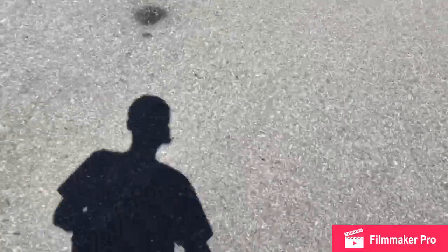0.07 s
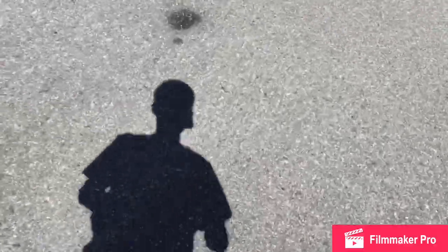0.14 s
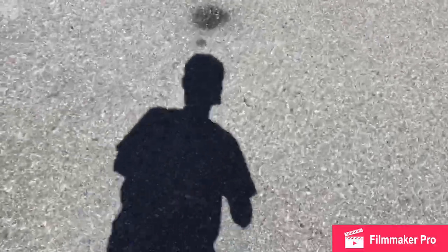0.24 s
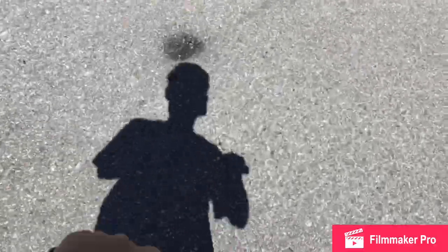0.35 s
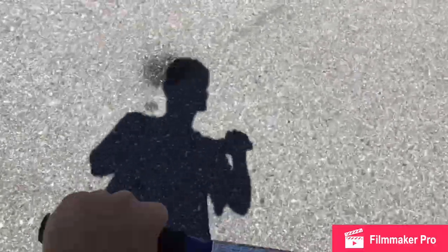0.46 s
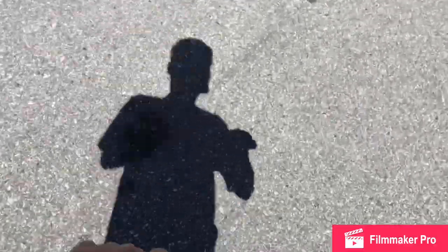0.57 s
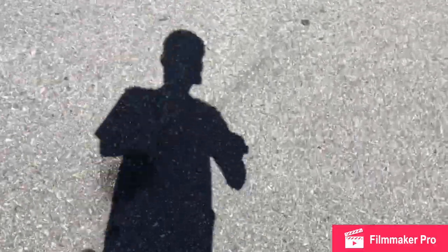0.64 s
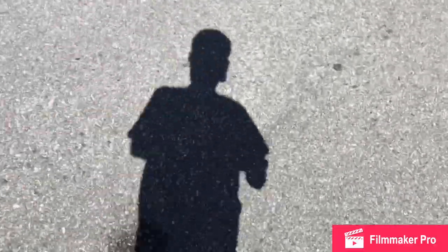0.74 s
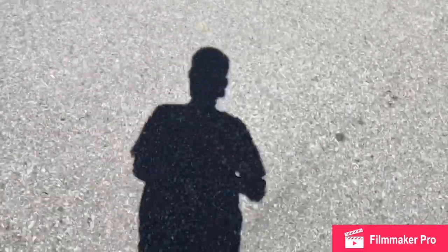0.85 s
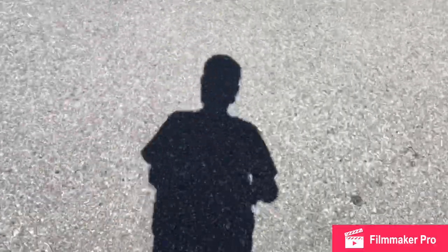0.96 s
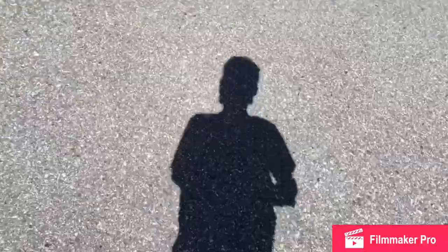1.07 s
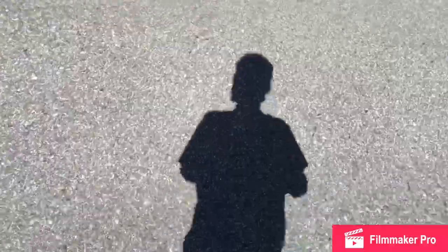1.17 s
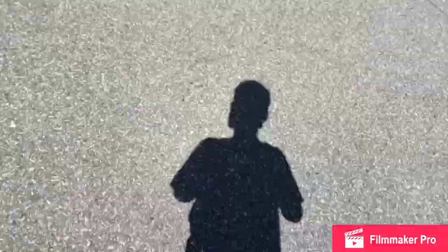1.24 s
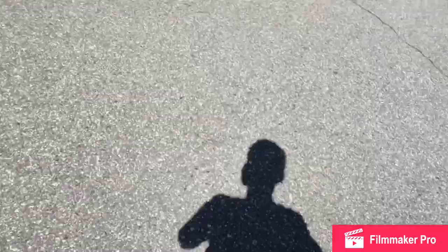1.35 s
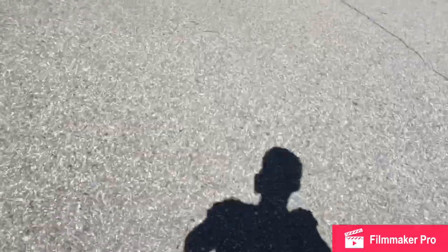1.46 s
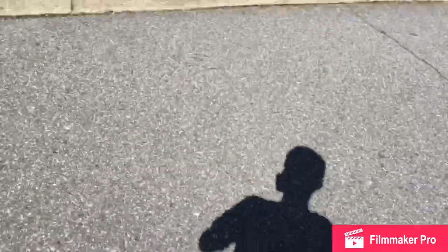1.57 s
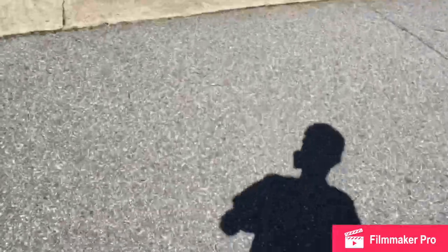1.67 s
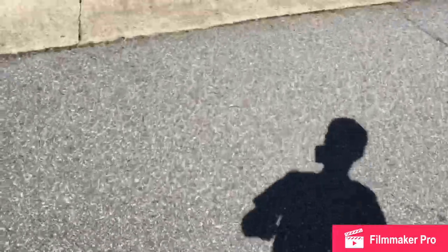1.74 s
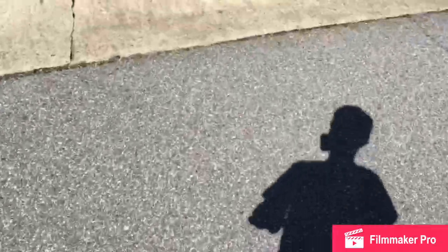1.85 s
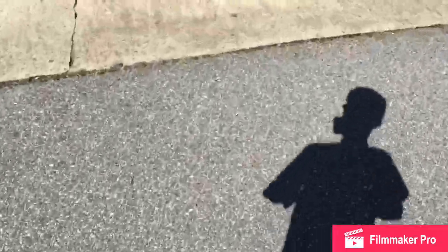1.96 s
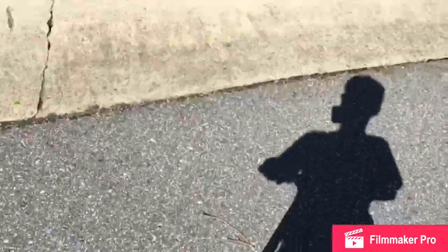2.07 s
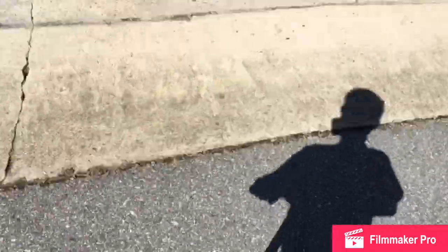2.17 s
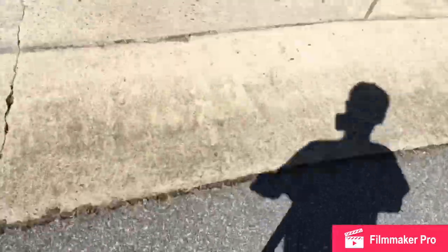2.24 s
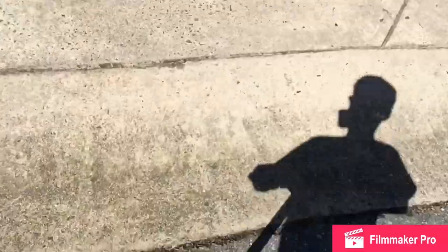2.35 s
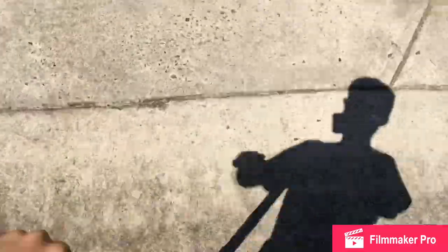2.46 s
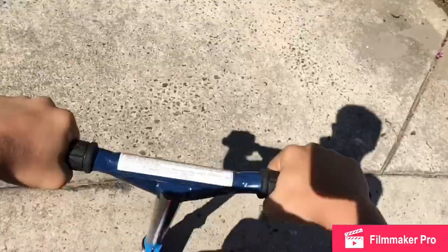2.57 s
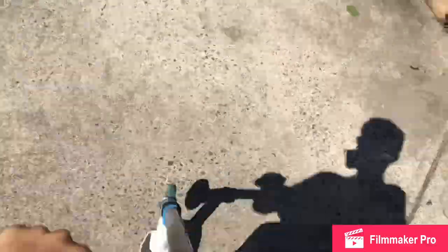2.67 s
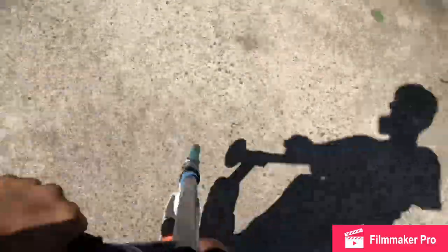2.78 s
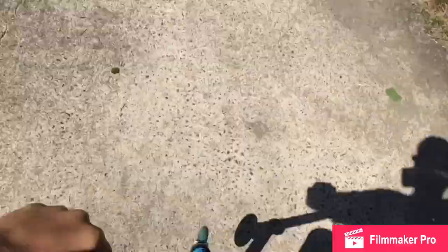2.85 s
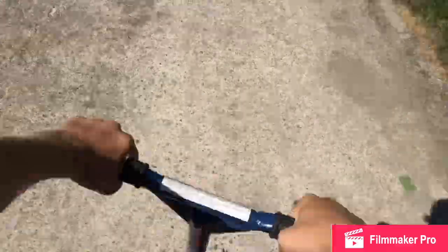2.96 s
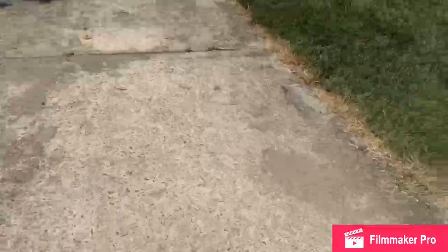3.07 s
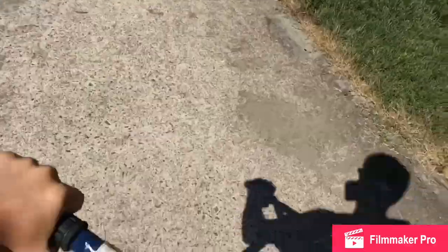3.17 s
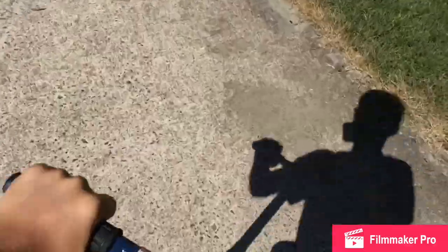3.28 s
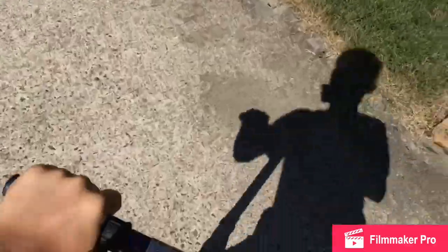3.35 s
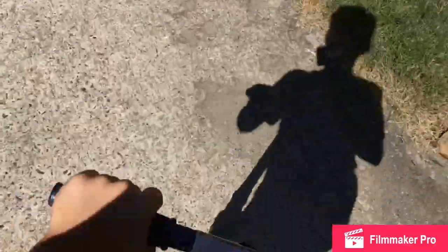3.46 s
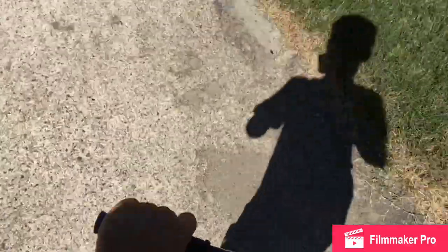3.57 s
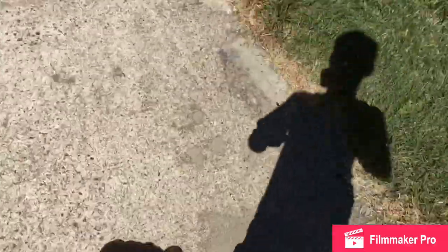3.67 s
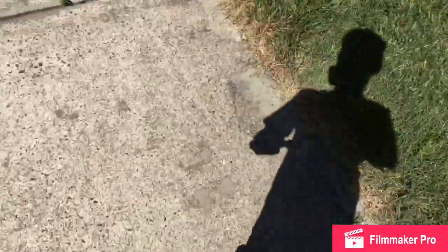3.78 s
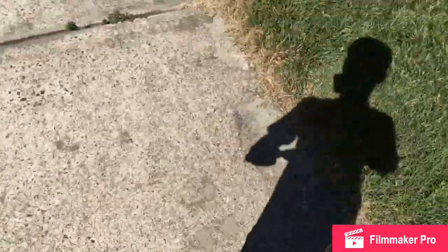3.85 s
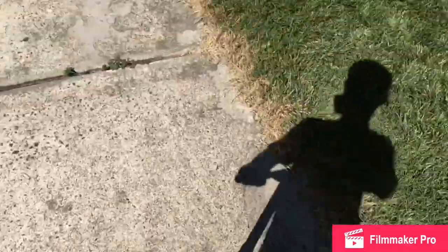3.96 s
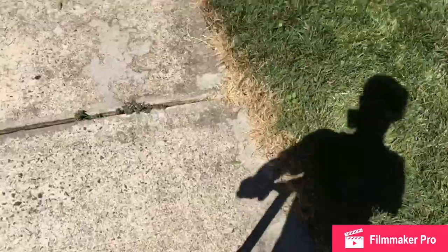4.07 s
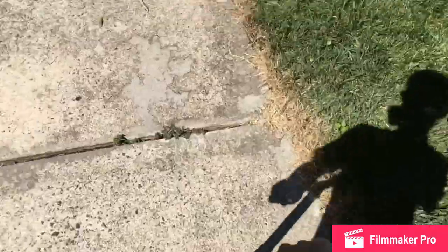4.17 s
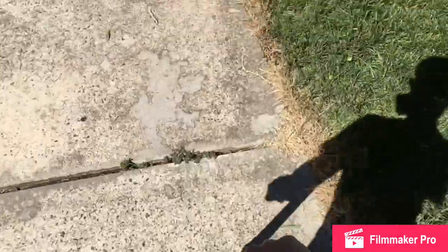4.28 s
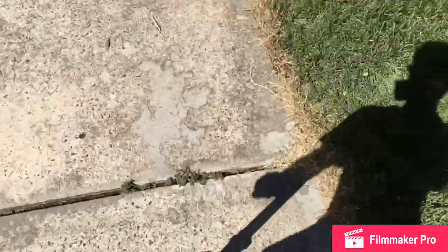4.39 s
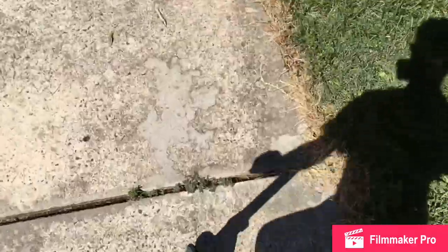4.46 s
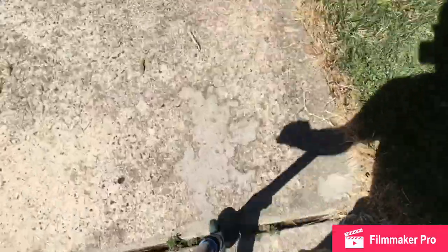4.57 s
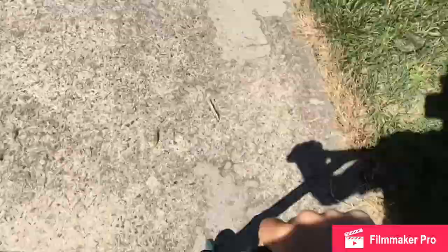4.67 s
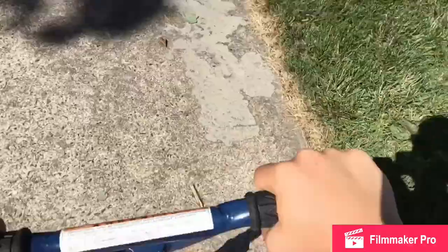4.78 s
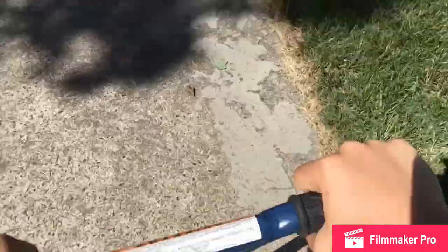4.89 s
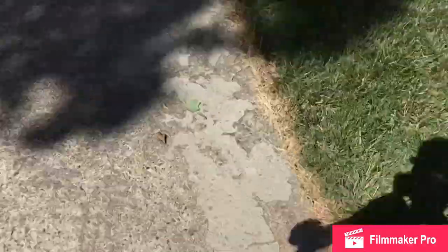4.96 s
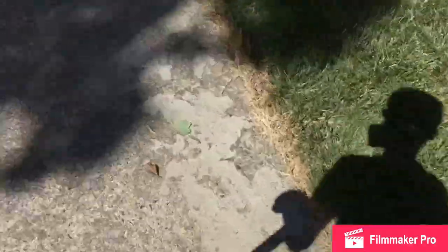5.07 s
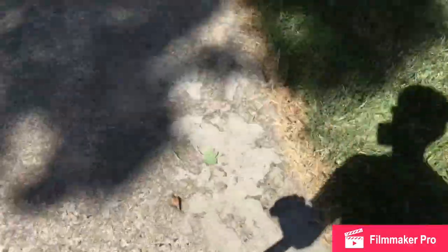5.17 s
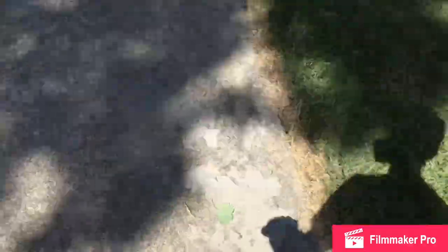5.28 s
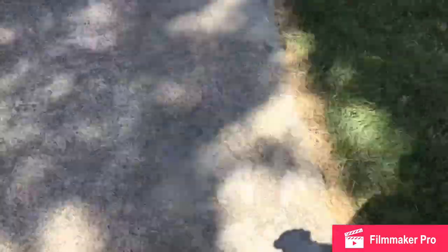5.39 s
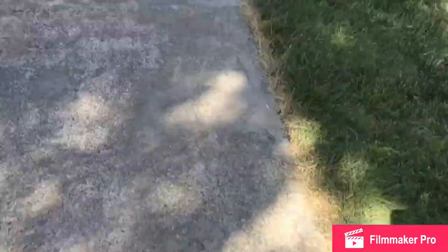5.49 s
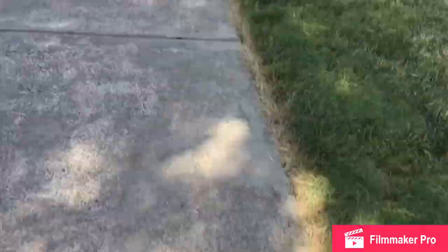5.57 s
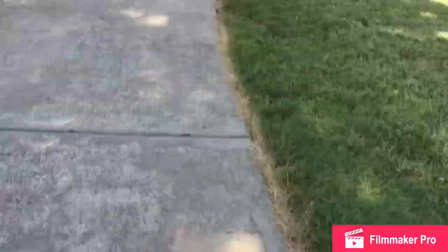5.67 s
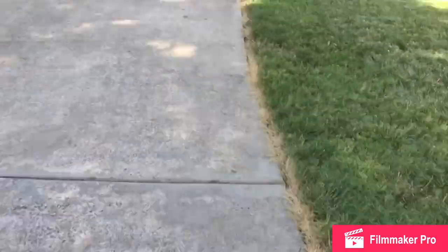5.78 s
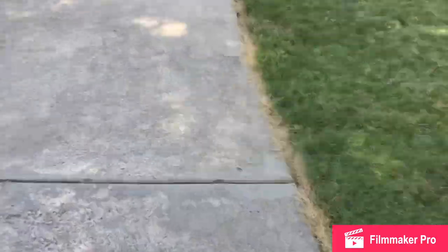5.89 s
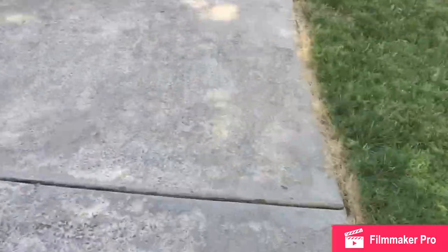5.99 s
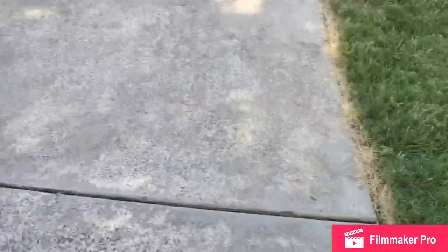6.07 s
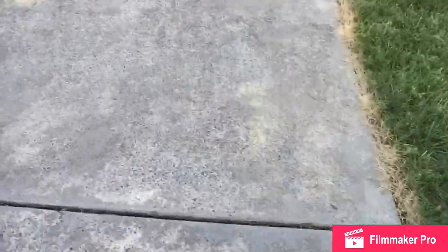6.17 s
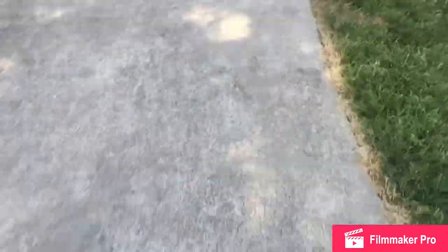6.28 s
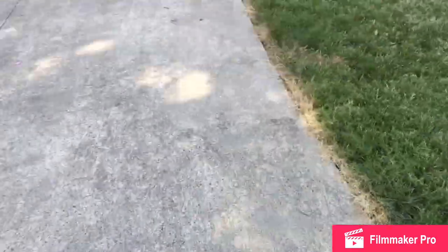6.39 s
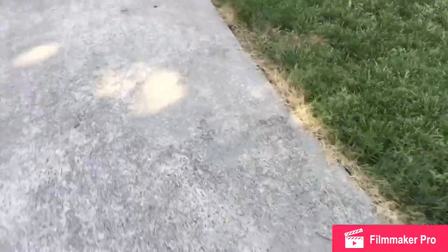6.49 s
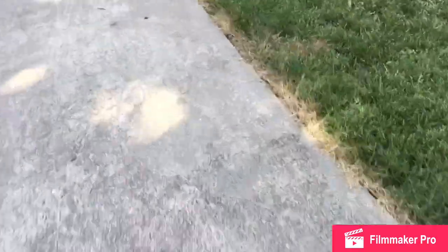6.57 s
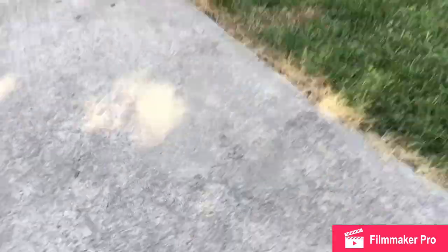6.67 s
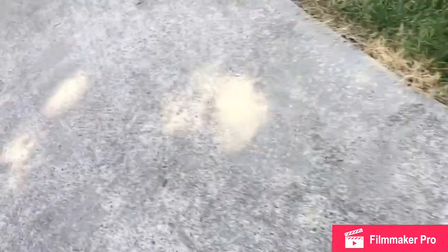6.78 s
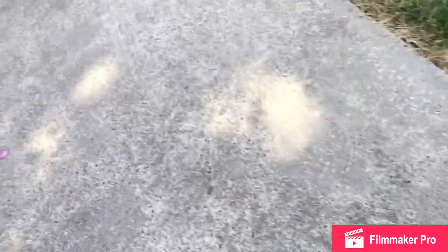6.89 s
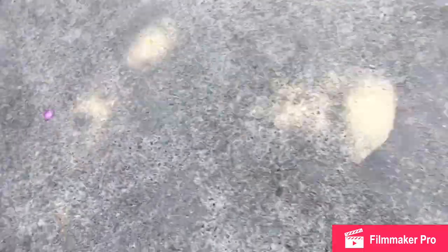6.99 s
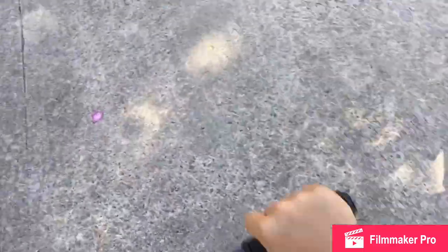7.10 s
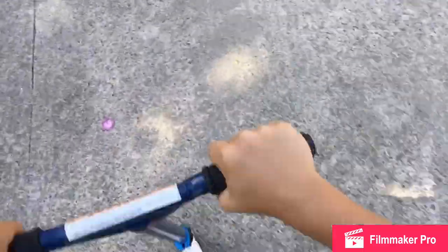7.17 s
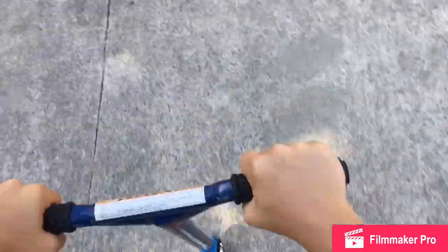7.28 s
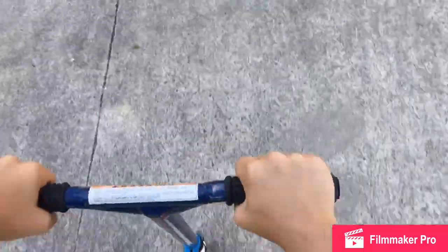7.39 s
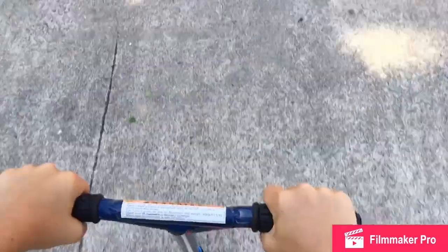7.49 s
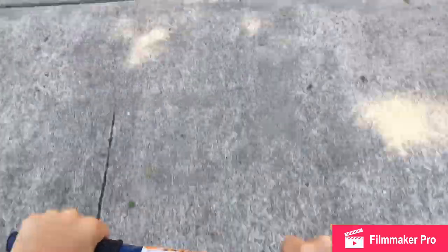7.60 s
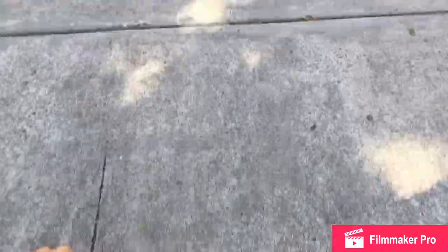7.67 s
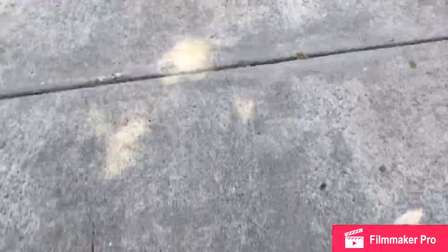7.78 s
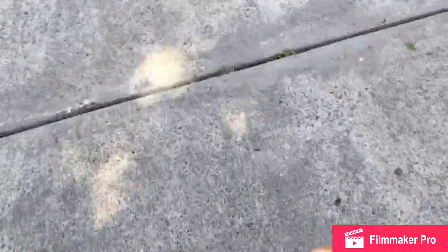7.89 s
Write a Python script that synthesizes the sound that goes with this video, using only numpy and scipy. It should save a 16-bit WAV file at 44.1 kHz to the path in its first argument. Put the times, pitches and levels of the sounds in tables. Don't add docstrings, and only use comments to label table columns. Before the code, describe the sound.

A low grainy rolling sound with faint gritty hiss and thin wheel whirr, wind buffeting the microphone. Ticking thickens before a burst of kerb knocks and scrapes, followed by one sharp ringing landing clack, the loudest event. Afterwards it is calmer: shoe scuffs, sandy crunch, and isolated then clustered hollow knocks on concrete. Open dry street, heard close from the handlebar.

```python
import sys
import numpy as np
from scipy import signal
from scipy.io import wavfile

SR = 44100
rng = np.random.default_rng(int(sys.argv[2]) if len(sys.argv) > 2 else 0)


def makeup_ratio(level_db):
    decades = np.asarray(level_db, float) / 20
    return 10 ** decades


def materialize(psi):
    bounded = np.clip(np.atleast_2d(psi).T, -1, 1)
    quanta = np.round(bounded * 32767).astype(np.int16)
    wavfile.write(sys.argv[1], SR, quanta)


N = 350154

# time in seconds, level in dB.
BREEZE = [(0, -73), (0.5, -41), (1.2, -49.5), (2.5, -46), (3.2, -49), (4.8, -47.5), (5.9, -46.5),
          (6.8, -42.5), (7.4, -64), (7.94, -46)]
# peak time in seconds, peak in dB,
# rise and fall in seconds per 10 dB.
GUSTS = [(0.0, -32.5, .02, 0.0098), (0.16, -55, 0.027, 0.39), (0.43, -38, 0.88, 0.016),
         (1.3, -45, 0.16, 0.09), (1.64, -28.5, 0.022, 0.033), (2.1, -43, 0.32, 0.39),
         (2.56, -39, 0.05, 0.27), (2.735, -23.5, 0.0085, 0.04), (2.99, -40, 0.073, 0.015),
         (3.075, -30, 0.0086, 0.025), (3.29, -49.5, 0.06, 0.29), (3.91, -50, 0.083, 0.17),
         (4.69, -37.5, 0.028, 0.028), (5.08, -42.5, 0.13, 0.069), (6.1, -48, 0.04, 0.048),
         (6.9, -27.5, 0.087, 0.021), (6.98, -44, 0.027, 0.93), (7.54, -51, 0.053, 0.2)]
# frequency in Hz, density in dB per Hz.
WIND_COLOUR = [(18, -40.5), (30, -4), (47, 0), (65, -1), (97, -5.5), (172, -9.5), (204, -16.5), (248, -14),
               (302, -24), (400, -23), (520, -48), (880, -120)]
# start in seconds, peak in dB, pitch in Hz,
# time to fall 60 dB in seconds.
THUMPS = [(2.529, -30, 80, 0.17), (2.7185, -11, 33, 0.11), (2.7485, -23, 79, 0.28), (1, -29, 52, 0.56),
          (1.1, -29, 61, 0.23), (0.36, -28.5, 62, 0.28), (2.783, -16.5, 59, 0.086), (6.842, -26, 180, .05),
          (6.869, -42, 140, 0.056), (6.891, -26, 120, 0.055), (6.913, -19, 72, .1), (6.96, -37, 83, 0.54),
          (2.031, -32.5, 66, 0.49), (0.25, -26.5, 62, 0.16)]
# peak time in seconds, peak in dB, rise and fall in seconds per 10 dB.
DUST = [(.2, -75.5, 0.15, 0.14), (.7, -72.5, 0.16, 0.067), (1.1, -75.5, 0.12, 0.14),
        (1.45, -71, 0.15, 0.12), (2.1, -74, 0.1, 0.21), (3.7, -83, 0.13, 0.031), (4.1, -70.5, 0.11, 0.1),
        (4.25, -74.5, 0.081, 0.083), (5.83, -67, .08, .08), (7.1, -81.5, 0.076, 0.22),
        (7.6, -78.5, 0.11, 0.091), (7.85, -75, 0.13, 0.2)]
# start in seconds, length in seconds, level in dB, fading in dB.
DRAGS = [
    (2.554, 0.02, -57, 17),
    (2.71, 0.046, -37.5, 21),
    (3.08, 0.14, -48.5, 5),
    (3.296, 0.23, -51.5, 5),
    (5.036, 0.042, -40.5, 5.5),
    (5.127, 0.13, -46, 12),
]
# frequency in Hz, density in dB per Hz.
SOLE_COLOUR = [(590, -29.5), (1000, 3.5), (1220, -4), (1630, -1), (2150, -2), (3500, -5), (5070, -15),
               (9380, -26), (16000, -30)]
# peak time in seconds, peak in dB, rise and fall in seconds per 10 dB.
SKIDS = [(.47, -49, .008, 0.0083), (1.46, -53, 0.012, 0.014), (2.54, -38, 0.01, 0.0066),
         (2.585, -43, 0.007, 0.0091), (2.676, -42.5, 0.0044, 0.02), (2.71, -37.5, 0.0055, 0.012),
         (2.755, -41.5, 0.026, 0.015), (2.796, -39.5, 0.004, 0.0053), (2.836, -34, .005, 0.0073),
         (2.85, -46, 0.0058, 0.023), (3.08, -24, 0.0048, 0.0084), (4.68, -47, .005, 0.024),
         (4.98, -47, 0.0035, 0.012), (6.38, -52.5, .005, 0.0063), (6.49, -46.5, .005, 0.034),
         (6.535, -51, .01, 0.053), (6.74, -41, .005, 0.017), (7.22, -47, 0.0071, 0.009)]
# peak time in seconds, peak in dB, rise and fall in seconds per 10 dB.
RASPS = [
    (3.1, -42, 0.014, 0.025),
    (3.16, -53, .03, 0.022),
    (3.205, -54, 0.018, 0.018),
    (3.33, -62, 0.089, 0.031),
    (3.46, -66, 0.072, .03),
    (5.04, -56, 0.021, 0.013),
    (5.15, -63, 0.025, 0.028),
    (2.705, -39, .004, 0.02),
]
# time in seconds, level in dB.
TWANGS = [
    (2.534, -46),
    (2.585, -53),
    (2.701, -43),
    (2.844, -56),
    (3.071, -42),
    (4.972, -54),
]
# pitch in Hz, level in dB, time to fall 60 dB in seconds.
SPRING_MODES = [(4200, -9, .4), (4235, -12, .3), (4520, -3, .15), (3930, -5, .15)]
# time in seconds, pitch in Hz.
HUB_PITCH = [(0.0, 3324), (0.17, 3634), (0.31, 3245), (2.34, 3633), (2.59, 3128), (2.67, 3470),
             (4.38, 3367), (4.42, 3030), (4.71, 3590), (4.78, 3198), (5.48, 3393), (5.7, 3048),
             (5.97, 3434), (7.94, 3133)]
# share of the hub pitch, level in dB, time to fall 60 dB in seconds.
HUB_MODES = [(.76, -8.5, .02), (.96, -0.5, .015), (1.01, 0.5, 0.02), (1.071, -4, 0.02)]
# peak time in seconds, gain in dB, rise and fall in seconds per 10 dB.
COASTING = [(4.1, 5, 0.22, 0.42), (4.58, 6.2, 0.068, 0.041), (5.36, 12, 0.089, 0.032),
            (6.05, 9, 0.07, 0.068), (6.22, 10, 0.067, 0.043), (2.1, 5, 0.17, 0.42)]
# time in seconds, peak in dB.
ASPHALT_TICKS = [(0.1102, -78), (0.1262, -56.5), (0.177, -68), (0.191, -50.5), (0.2334, -55), (0.4175, -59),
                 (.485, -67), (0.5108, -47.5), (0.5846, -60), (.62, -60), (.715, -65), (.845, -62),
                 (0.871, -54), (0.8999, -48), (0.9852, -62), (1.004, -53), (1.018, -51.5), (1.057, -51),
                 (1.2032, -64), (1.222, -51), (1.2785, -60), (1.2896, -49.5), (1.3194, -58), (1.3504, -55),
                 (1.4306, -43), (1.451, -63), (1.4761, -59), (1.507, -46), (1.568, -42), (1.574, -38.5),
                 (1.586, -50), (1.624, -50), (1.653, -52), (1.726, -49.5), (1.7535, -65), (1.786, -49),
                 (1.8317, -47.5), (1.8685, -56), (1.9168, -48), (1.94, -48), (1.96, -39.5), (1.977, -40),
                 (1.9956, -38), (2.019, -49), (2.073, -45.5), (2.1096, -43), (2.1346, -49.5), (2.162, -55),
                 (2.2239, -53), (2.2437, -46), (2.2664, -52), (2.2823, -45), (2.304, -41), (2.32, -50),
                 (2.3413, -49), (2.397, -62), (2.413, -44.5), (2.441, -51)]
# time in seconds, peak in dB.
LATER_TICKS = [(2.516, -54), (2.5264, -42), (2.5326, -28.5), (2.5576, -46), (2.5801, -46), (2.6717, -31),
               (2.695, -26), (2.701, -21), (2.708, -35), (2.7914, -54), (2.8347, -48), (2.865, -50),
               (2.881, -57), (3.051, -51), (3.062, -48), (3.068, -20.5), (3.073, -15), (4.6749, -33),
               (4.701, -39.5), (4.9738, -38.5), (5.385, -56.5), (5.4117, -69), (5.5, -42.5), (5.5414, -63),
               (5.9235, -59), (5.951, -50.5), (6.339, -53), (6.3594, -43), (6.3905, -57), (6.4275, -58),
               (6.486, -37.5), (6.53, -45), (6.616, -47.5), (6.676, -55), (6.694, -46), (6.7334, -36),
               (6.823, -59), (6.913, -51.5), (7.0485, -67), (7.1974, -56), (7.229, -46.5), (7.26, -62),
               (7.3363, -64)]
# start and end in seconds, ticks a second, level in dB.
CHATTER = [(0.088, 0.702, 12, -77), (0.801, 1.5, 18, -70), (1.497, 2.5, 15, -68),
           (3.602, 4.395, 12.8, -71.5), (5.344, 5.566, 14, -72), (6.201, 6.902, 17, -67),
           (7.107, 7.397, 15.1, -72)]
# pitch in Hz, level in dB, time to fall 60 dB in seconds.
CLAMP_MODES = [(3680, -14.5, 0.016), (3960, -4, 0.015), (8510, -2, 0.033), (8740, -16, 0.0067),
               (8550, -17.5, 0.013), (11260, -16.5, 0.02), (12600, -23.5, 0.0086)]
# time in seconds, deck in dB, stem in dB.
BLOWS = [(0.513, -55, -64), (2.533, -41, -30.5), (2.587, -44.5, -50), (2.702, -30, -25.5),
         (2.79, -45.5, -39.5), (2.844, -44.5, -35.5), (3.071, -21, -20), (4.678, -50, -47),
         (4.971, -36.5, -31), (6.53, -46, -35), (6.733, -49, -28), (6.745, -65, -29.5)]
# pitch in Hz, level in dB, time to fall 60 dB in seconds.
DECK_MODES = [(495, 6, 0.15), (646, -5, 0.07), (1092, 2, 0.1), (1480, -16, 0.1), (1760, 4, .11),
              (2046, -8, 0.1), (2545, -1, 0.037), (2980, -10, .09), (3335, -9, .03), (3474, -9.5, 0.03),
              (3890, -18, 0.17), (4260, -15, 0.11)]
# pitch in Hz, level in dB, time to fall 60 dB in seconds.
STEM_MODES = [(868, -1, 0.12), (2370, -3, 0.085), (1006, -7.5, 0.08), (1193, -3, 0.043), (2300, -7, 0.04)]
# peak time in seconds, peak in dB, rise and fall in seconds per 10 dB.
SAND = [(0.47, -53, 0.047, 0.012), (3.7, -61, 0.13, 0.029), (4.12, -65, 0.14, 0.28),
        (5.83, -50, 0.075, 0.059), (7.06, -60.5, 0.21, 0.065), (7.2, -56, 0.11, 0.063),
        (7.38, -54.5, 0.032, 0.047), (7.61, -65, 0.05, 0.031), (7.85, -59.5, 0.23, 0.12)]
# frequency in Hz, density in dB per Hz.
GRIT_COLOUR = [(710, -32), (1200, -8.5), (1540, -9), (2400, -0.5), (2660, -7), (3020, -9), (4970, -13.5),
               (5500, -20), (7150, -58), (12100, -120)]
# frequency in Hz, density in dB per Hz.
SIZZLE_COLOUR = [(3800, -32), (4800, -6), (5600, 0.5), (7100, -8), (7900, -12.5), (10000, -15.5),
                 (16000, -21)]
# time in seconds, load on the deck in dB, grit under the wheels in dB.
RIDE = [(0.0, -52.5, -70), (0.2, -52.5, -61.5), (0.47, -45.5, -61.5), (0.68, -52.5, -64), (1.2, -49.5, -62),
        (1.48, -46, -61), (1.7, -52, -61.5), (2.3, -51, -62.5), (2.95, -54.5, -68.5), (3.75, -56, -67),
        (4.3, -56.5, -65), (4.9, -51, -66.5), (5.4, -53.5, -61), (6.15, -55, -67.5), (6.56, -49.5, -60),
        (6.97, -54.5, -66), (7.22, -45, -64), (7.94, -57, -65.5)]
# frequency in Hz, density in dB per Hz.
ROLL_COLOUR = [(120, -29.5), (200, -13), (269, -4.5), (442, -5), (491, -4.5), (640, 1.5), (790, -5),
               (1220, -0.5), (1620, -24), (2500, -28.5), (3250, -54), (5500, -120)]
# time in seconds, peak in dB, pitch in Hz.
SNAPS = [(0.5123, -30, 2560), (.515, -35, 3300), (1.4318, -32.5, 3530), (1.4505, -45, 2980),
         (1.5083, -31.5, 3500), (2.5336, -15, 3000), (2.538, -16, 1900), (2.6712, -20, 2930),
         (2.6722, -14, 3720), (2.7015, -17, 2540), (2.7035, -9.5, 4330), (2.7045, -19, 5200),
         (2.7945, -15, 2452), (2.8336, -28, 3740), (2.7675, -40, 3600), (2.791, -16, 2768),
         (2.844, -17.5, 2240), (3.0495, -32, 3210), (3.0598, -32, 3200), (3.0708, 0.5, 3300),
         (3.0755, -4, 3400), (3.0772, -2.5, 2700), (4.9735, -22.5, 2980), (5.5013, -45, 4150),
         (6.4827, -30.5, 2960), (1.5462, -49, 1800), (2.5726, -31, 2590), (3.559, -42.5, 1290),
         (4.4903, -37.5, 2000), (4.883, -49, 2390), (5.955, -48, 2000), (7.2155, -35, 2195),
         (7.338, -43, 2400)]
# time in seconds, peak in dB.
TOUCHES = [
    (3.048, -42.5),
    (3.0588, -47),
]
# time in seconds, peak in dB, body pitch in Hz, crack in dB.
STONES = [(0.325, -40.5, 1290, -64), (1.059, -37.5, 1210, -62), (1.348, -33, 1160, -48),
          (0.4675, -34, 860, -57), (0.483, -44, 1190, -50), (0.5115, -29.5, 1070, -37),
          (1.431, -25, 1050, -33.5), (1.45, -38, 1110, -40.5), (1.476, -28.5, 1080, -56),
          (1.506, -32.5, 1020, -34.5), (1.545, -36, 1520, -56), (1.961, -42, 1480, -51),
          (1.993, -39.5, 1490, -50), (2.091, -40, 1520, -46)]
# time in seconds, peak in dB, body pitch in Hz, crack in dB.
KERB = [(2.519, -41, 1440, -51), (2.5352, -19, 1300, -24.5), (2.573, -35, 1360, -37.5),
        (2.585, -26, 960, -40.5), (2.601, -30, 970, -53), (2.673, -35.5, 1490, -17.5),
        (2.695, -20.5, 697, -19), (2.7, -11, 1183, -16.5), (2.701, -21, 522.6, -59),
        (2.722, -26, 297.2, -62), (2.736, -27, 417, -54), (2.764, -34.5, 410, -60),
        (2.7904, -24, 1770, -27.5), (2.801, -34, 1010, -60), (2.83, -36, 675, -33), (2.844, -20, 823, -36),
        (2.846, -19.5, 1360, -44), (2.855, -25, 1070, -51), (3.0665, -22.5, 670, -18.5),
        (3.07, -10, 1230, -3), (3.07, -26.5, 397, -37.5), (3.077, -19, 1120, -12),
        (3.124, -32.5, 1060, -50)]
# time in seconds, peak in dB, body pitch in Hz, crack in dB.
JOINTS = [(3.558, -46, 1100, -53), (4.234, -44, 1370, -50), (4.488, -39, 1010, -55),
          (4.664, -40.5, 1300, -58.5), (4.673, -23.5, 1077, -44.5), (4.844, -43, 1310, -69),
          (4.878, -40.5, 750, -62), (4.883, -38, 1500, -58), (4.969, -25, 1494, -23),
          (4.974, -33.5, 414, -60), (4.979, -20.5, 1126, -36), (5.954, -32.5, 1350, -61),
          (6.375, -26.5, 1380, -54), (6.473, -38, 1120, -61), (6.483, -21, 1090, -42),
          (6.5143, -21, 1400, -54), (6.527, -18.5, 1390, -46), (6.534, -20.5, 1430, -53.5),
          (6.538, -25, 1370, -43.5), (6.548, -27.5, 1130, -44.5), (6.724, -32, 600, -55),
          (6.729, -25.5, 1124, -35), (6.738, -30, 1090, -50), (6.737, -55, 880, -34.5),
          (7.214, -35.5, 670, -54), (7.217, -31, 1470, -48.5), (7.226, -29, 1120, -53),
          (7.336, -36, 1240, -44)]
# frequency in Hz, density in dB per Hz.
CRACK_COLOUR = [(900, -23.5), (1800, -2.5), (3300, 9), (4340, 0.5), (6000, -0.5), (7400, -30),
                (9000, -16.5), (12000, -32)]


def rms_one(x):
    return x / np.sqrt(np.mean(x ** 2) + 1e-20)


def bandpass(x, order, low, high):
    return signal.sosfilt(signal.butter(order, [low, high], "band", fs=SR, output="sos"), x)


def in_time(rows):
    s, *columns = np.transpose(rows)
    return [np.interp(np.arange(N) / SR, s, c) for c in columns]


def swells(rows):
    total = 0
    for s, db, rise, fall in rows:
        start = s - 6 * max(rise, 0.005)
        end = s + 6 * max(fall, 0.005)
        total = total + makeup_ratio(*in_time([(start, db - 60), (s, db), (end, db - 60)]))
    return total


def drift(rate):
    step = 40
    r = np.exp(-2 * np.pi * rate * step / SR)
    noise = rng.standard_normal(N // step + 2002)
    slow = signal.lfilter([1], [1, -2 * r, r * r], noise)[2000:]
    return np.interp(np.arange(N) / step, np.arange(len(slow)), rms_one(slow))


def ring(clicks, hz, t60):
    r, w = makeup_ratio(-60 / (t60 * SR)), 2 * np.pi * hz / SR
    return signal.lfilter([0, np.sin(w)], [1, -2 * r * np.cos(w), r * r], clicks + 1e-18)


def grains(per_s, spread_db):
    sizes = makeup_ratio(spread_db * np.minimum(rng.exponential(1, (2, N)), 5))
    signs = rng.choice([-1, 1], (2, N))
    return sizes * signs * (rng.random((2, N)) < per_s / SR)


def coloured(source, spectrum, patchy_db, rate):
    hz, level = np.transpose(spectrum)
    edges = np.geomspace(hz[0], hz[-1], round(3 * np.log2(hz[-1] / hz[0])) + 1)
    out, together = 0, drift(rate)
    for k, (low, high) in enumerate(zip(edges, edges[1:])):
        band = bandpass(source[k % 2], 2, low, high)
        centre_db = np.interp(np.log(low * high) / 2, np.log(hz), level)
        flicker_db = patchy_db * (0.7 * together + 0.7 * drift(rate))
        out = out + band * makeup_ratio(centre_db + flicker_db)
    return rms_one(out)


def wind():
    level = np.hypot(makeup_ratio(*in_time(BREEZE)), swells(GUSTS))
    return level * coloured(rng.standard_normal((2, N)), WIND_COLOUR, patchy_db=3.5, rate=30)


def street(x):
    t = np.arange(SR // 2) / SR
    dull = signal.lfilter([0.4], [1, -0.6], rng.standard_normal(len(t)))
    scatter = dull * makeup_ratio(-60 * t / 0.3) * (t > 0.008)
    response = makeup_ratio(-30) * scatter / np.sqrt(np.sum(scatter ** 2))
    response[0] = 1
    response[round(0.005 * SR)] = makeup_ratio(-18.5)
    return signal.fftconvolve(x, response)[:N]


def thumps():
    out, t = np.zeros(N + SR), np.arange(SR // 2) / SR
    for s, db, hz, t60 in THUMPS:
        at = round(s * SR)
        swing = np.minimum(t / 0.004, 1) * np.sin(2 * np.pi * hz * t)
        out[at:at + len(t)] += makeup_ratio(db - 60 * t / t60) * swing
    return out[:N]


def dust():
    hiss = rms_one(bandpass(rng.standard_normal(N), 3, 6100, 6850))
    return swells(DUST) * makeup_ratio(1.4 * drift(13)) * hiss


def shoe_and_skids():
    attack_s, release_s = 0.047, 0.077
    level = swells(SKIDS)
    for s, length, db, fading_db in DRAGS:
        end, end_db = s + length, db - fading_db
        level = level + makeup_ratio(*in_time([(s - 3 * attack_s, db - 63), (s, db), (end, end_db),
                                      (end + 3 * release_s, end_db - 60)]))
    return level * coloured(grains(8000, spread_db=3.5), SOLE_COLOUR, patchy_db=1.2, rate=30)


def rasp():
    return swells(RASPS) * rms_one(bandpass(grains(5000, spread_db=1.5)[0], 2, 3800, 8500))


def spring():
    s, blow_db = np.transpose(TWANGS)
    clicks = np.zeros(N)
    clicks[np.round(s * SR).astype(int)] = makeup_ratio(blow_db)
    return sum(makeup_ratio(db) * ring(clicks, hz, t60) for hz, db, t60 in SPRING_MODES)


def hubs(grit_db):
    sand = grains(670, spread_db=2.0)[0]
    turns = np.cumsum(*in_time(HUB_PITCH)) / SR
    song = 0
    for share, db, t60 in HUB_MODES:
        spin = np.exp(2j * np.pi * share * turns)
        decay = signal.lfilter([1], [1, -makeup_ratio(-60 / (t60 * SR))], sand / spin + 1e-18)
        song = song + makeup_ratio(db + 4 * drift(5)) * (spin * decay).imag
    return makeup_ratio(grit_db - 9.5) * rms_one(song) * (1 + swells(COASTING))


def tick_times():
    ticks = []
    for s, db in ASPHALT_TICKS + LATER_TICKS:
        ticks.append((s, min(db, 0)))
        ticks.append((s + 0.017 * rng.uniform(0.93, 1.0), min(db, -44) - 15))
    for start, end, per_s, db in CHATTER:
        steps = start + np.cumsum(rng.gamma(3, 1 / 3, 40)) / per_s
        sizes = rng.standard_normal(40)
        ticks += [(s, db + 6 * size) for s, size in zip(steps, sizes) if s < end]
    return np.transpose(ticks)


def clamp():
    s, peak_db = tick_times()
    at = np.round(s * SR).astype(int)
    chance = rng.standard_normal((len(at), len(CLAMP_MODES) + 1))
    rebound = at + np.round((0.0043 + 0.00054 * chance[:, -1]) * SR).astype(int).clip(1)
    out, contact = np.zeros(N), np.zeros(N)
    for k, (hz, db, t60) in enumerate(CLAMP_MODES):
        clicks = np.zeros(N)
        spread_db = 5 if db < -8 else 1
        clicks[at] = makeup_ratio(peak_db + db + spread_db * chance[:, k])
        clicks[rebound] += 0.63 * clicks[at]
        out += ring(clicks, hz, t60)
    contact[at] = makeup_ratio(peak_db - 4.5 + 0.67 * np.minimum(peak_db + 52, 0))
    hiss = signal.lfilter([1], [1, -makeup_ratio(-60 / (0.026 * SR))], contact) * rng.standard_normal(N)
    return out + bandpass(hiss, 1, 3500, 14000)


def frame():
    s, deck_db, stem_db = np.transpose(BLOWS)
    at = np.round(s * SR).astype(int)
    out = np.zeros(N)
    for modes, blow_db in ((DECK_MODES, deck_db), (STEM_MODES, stem_db)):
        for hz, db, t60 in modes:
            clicks = np.zeros(N)
            strength = makeup_ratio(blow_db + db + rng.normal(0, 1.5, len(s)))
            clicks[at] = strength * rng.choice([-1, 1], len(s))
            out += ring(clicks, hz, t60)
    return out


def scuff(grit_db):
    scuff_db = 20 * np.log10(np.hypot(makeup_ratio(grit_db), swells(SAND)))
    middling_db = -63
    sizzle_db = middling_db - 13.5 + 0.52 * (scuff_db - middling_db)
    sand = grains(4000, spread_db=3.5) * makeup_ratio(2.2 * drift(18))
    grit = makeup_ratio(scuff_db) * coloured(sand, GRIT_COLOUR, patchy_db=1.8, rate=8)
    return grit + makeup_ratio(sizzle_db + 1.5) * coloured(sand, SIZZLE_COLOUR, patchy_db=1.8, rate=8)


def rolling(load_db):
    bumps = grains(4000, spread_db=4.0)
    rumble = coloured(bumps, ROLL_COLOUR, patchy_db=3.0, rate=10)
    modes = DECK_MODES[:3] + STEM_MODES[:1] + STEM_MODES[2:4]
    ringing = sum(makeup_ratio(db) * ring(bumps[0], hz, t60 * 0.35) for hz, db, t60 in modes)
    return makeup_ratio(load_db) * (rumble + makeup_ratio(-5) * rms_one(ringing))


def snaps():
    out, t = np.zeros(N + SR), np.arange(SR // 50) / SR
    for s, db, hz in SNAPS:
        at = round(s * SR)
        out[at:at + len(t)] += makeup_ratio(db + 4 - 60 * t * hz / 12) * np.sin(2 * np.pi * hz * t)
    return out[:N]


def knocks():
    body, crack, fizz = np.zeros((3, N + SR))
    t = np.arange(SR // 5) / SR
    swell = np.sin(np.pi / 2 * np.minimum(t / 0.0015, 1))
    for s, body_db, hz, crack_db in STONES + KERB + JOINTS:
        length = 0.013 * (1000 / hz) ** 0.49 * makeup_ratio(0.16 * (body_db + 23.5))
        length_kept = max(length, 0.003)
        fizz_db = -11.5 + 1.6 * crack_db
        at = slice(round(s * SR), round(s * SR) + len(t))
        chatter = rng.standard_normal((3, len(t))) * makeup_ratio(-30 * t / length_kept)
        tone = bandpass(chatter[0] * swell, 3, hz * 0.88, hz * 1.14)
        thud = bandpass(chatter[1] * swell, 2, hz * 0.35, hz * 1.5)
        hollow = tone / np.abs(tone).max() + makeup_ratio(-3) * thud / np.abs(thud).max()
        body[at] += makeup_ratio(body_db) * hollow
        crack[at] += makeup_ratio(crack_db - 4 * t / length_kept) * chatter[1] * np.minimum(t / 0.0029, 1)
        fizz[at] += makeup_ratio(fizz_db + 4.5 - 2 * t / length_kept) * chatter[2] * np.minimum(t / 0.00033, 1)
    for s, crack_db in TOUCHES:
        at = round(s * SR)
        crack[at:at + len(t)] += makeup_ratio(crack_db - 60 * t / 0.015) * rng.standard_normal(len(t))
    crack = crack[:N]
    shaped = coloured(np.tile(crack + 1e-9, (2, 1)), CRACK_COLOUR, patchy_db=0, rate=5)
    shaped = shaped * np.sqrt(np.mean(crack ** 2))
    return body[:N] + bandpass(fizz[:N], 2, 6500, 17000) + shaped


def scene():
    load_db, grit_db = in_time(RIDE)
    at_microphone = wind() + thumps()
    ground = dust() + shoe_and_skids() + rasp() + scuff(grit_db) + rolling(load_db)
    scooter = street(spring() + clamp() + frame() + snaps() + knocks())
    return (at_microphone + ground + hubs(grit_db) + scooter)[None]


def top_cut(x):
    return signal.sosfilt(signal.butter(12, 16680, fs=SR, output="sos"), x)


def record(dry):
    x = signal.sosfilt(signal.butter(4, 44, "high", fs=SR, output="sos"), dry)
    x = 0.95 * np.tanh(x / 0.95) + makeup_ratio(-82) * rng.standard_normal(dry.shape)
    x = signal.sosfilt(signal.cheby2(12, 70, 16750, fs=SR, output="sos"), x)
    x = signal.sosfilt(signal.ellip(10, 1, 32, 15850, fs=SR, output="sos"), x)
    return top_cut(x)


dry = scene()
out = record(dry)
materialize(out)
```